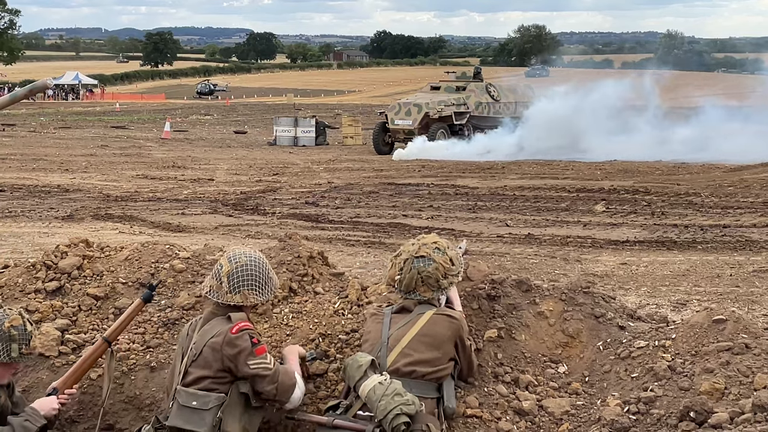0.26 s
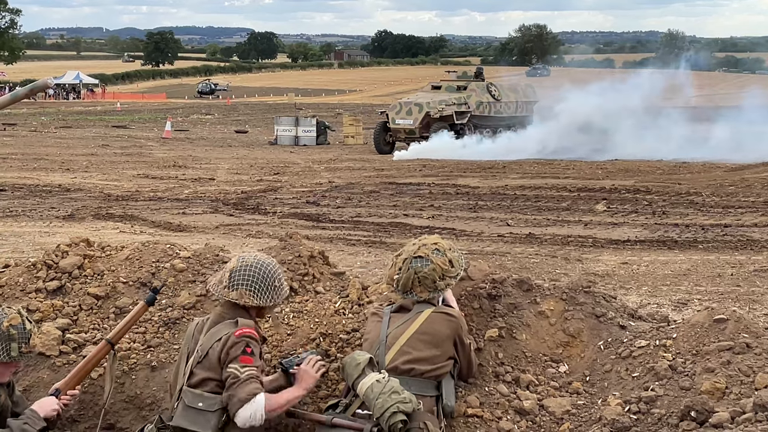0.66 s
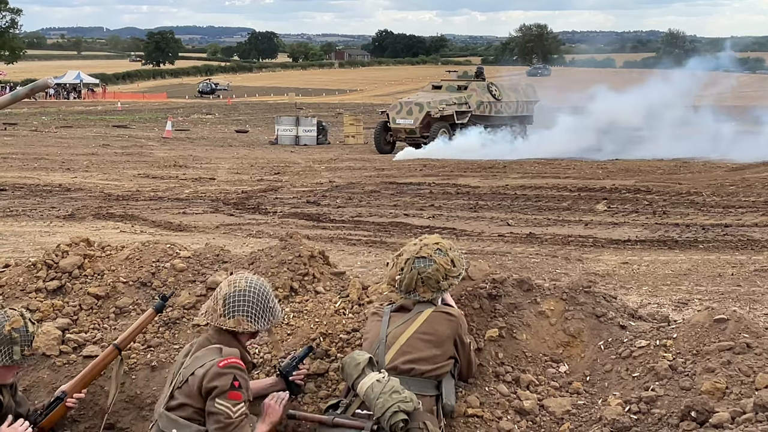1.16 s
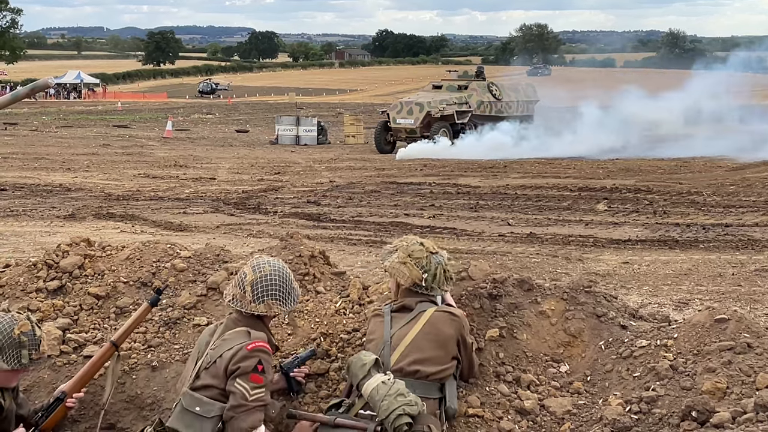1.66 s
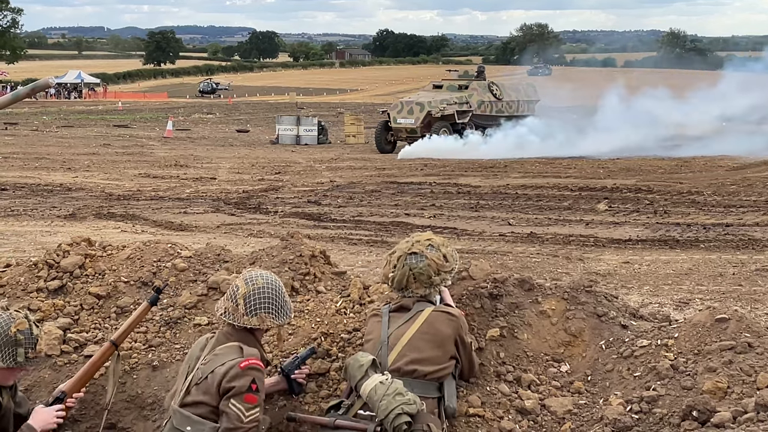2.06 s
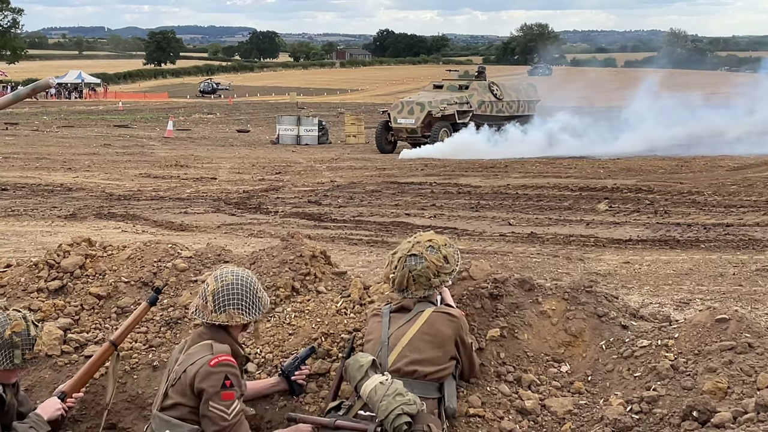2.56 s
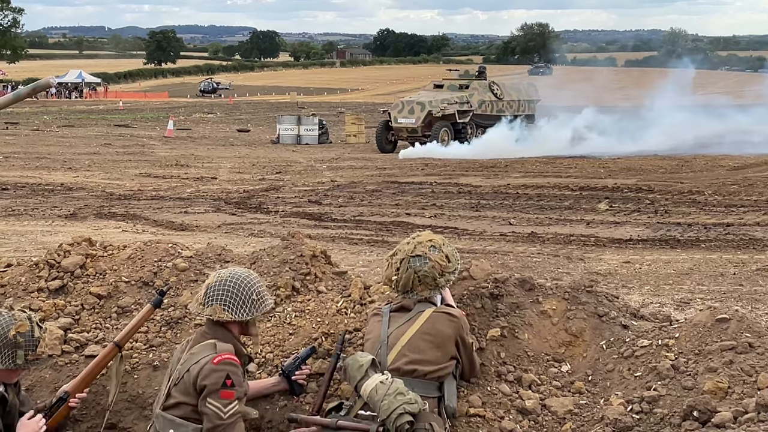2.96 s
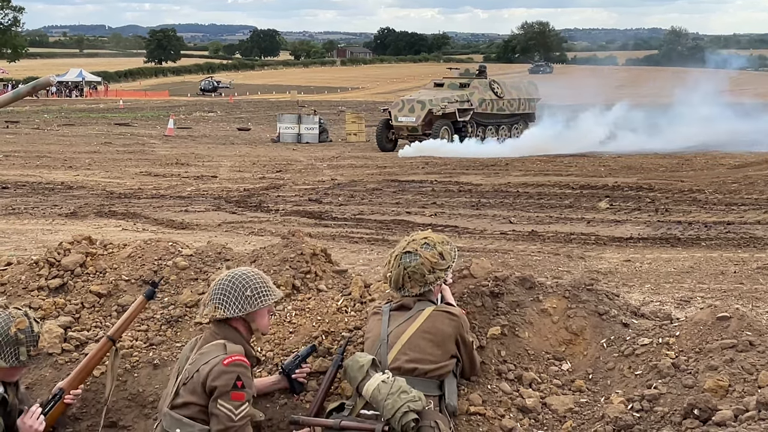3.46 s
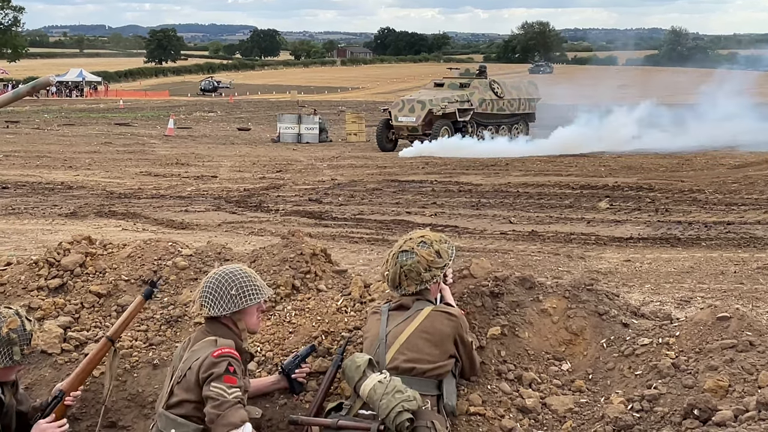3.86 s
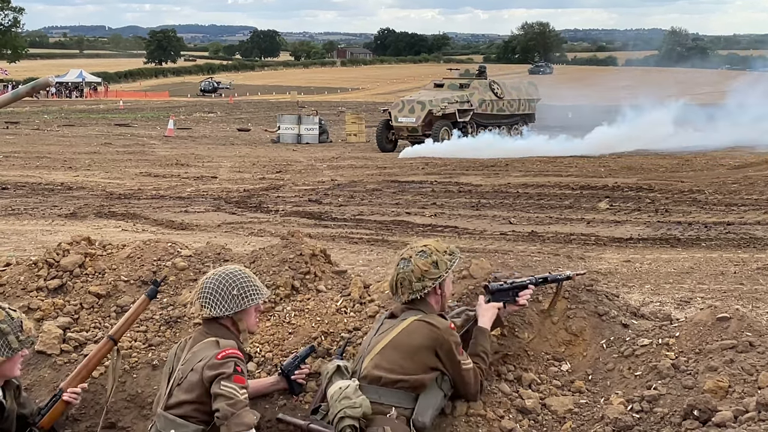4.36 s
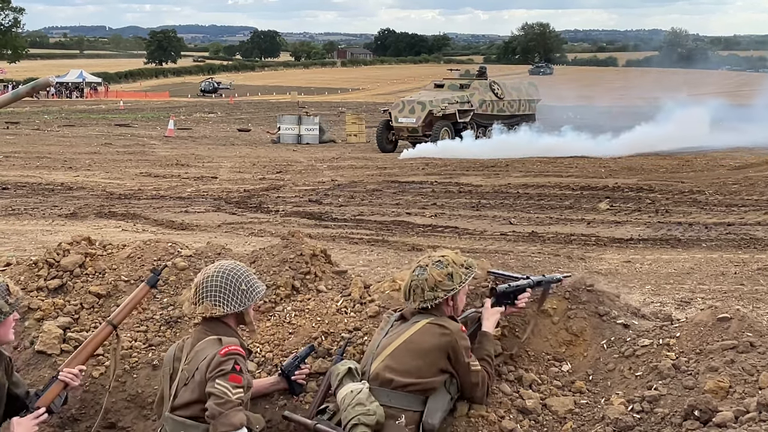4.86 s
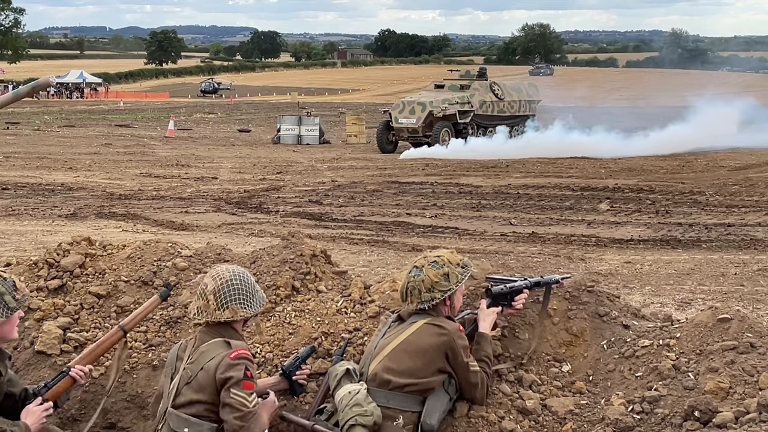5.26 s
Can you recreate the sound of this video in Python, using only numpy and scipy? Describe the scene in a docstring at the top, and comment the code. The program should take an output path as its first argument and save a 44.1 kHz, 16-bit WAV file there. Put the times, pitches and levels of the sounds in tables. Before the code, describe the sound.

From an earth trench in an open field, a machine-gun burst is already hammering, then stops. Separate rifle and carbine shots follow, with gaps of rolling echo and small metal clinks. A brief scrape leads into a fast six-shot submachine-gun burst from the left, one very strong rifle shot, and finally two machine guns overlapping. A faint engine idles far off. The close stereo microphone flattens the peaks.

```python
"""An open field, heard from behind an earth trench: blank gunfire from two machine guns,
a submachine gun, a carbine and single rifle shots. Each blast is a bass step with a ragged roar of gas;
it scatters off the dirt as fading noise and rolls away over the field. Small metal parts clink and something
scrapes close by, as short sprays of noise. A vehicle far off idles as three wavering tones.
The microphone smears each blast into a falling thump and flattens its peak."""
import sys
import numpy as np
from scipy import signal
from scipy.fft import rfft, irfft, next_fast_len
from scipy.io import wavfile
from scipy.ndimage import uniform_filter1d, map_coordinates

SR = 44100
rng = np.random.default_rng(int(sys.argv[2]) if len(sys.argv) > 2 else 0)


def log_audio(samples):
    """Write samples as a 16-bit WAV file to the path given in sys.argv[1]."""
    # one column per channel
    frames = np.atleast_2d(samples).T
    # limit to full scale, then quantise
    limited = np.clip(frames, -1, 1)
    pcm = np.round(limited * 32767).astype(np.int16)
    wavfile.write(sys.argv[1], SR, pcm)


N = 243431
SHOT = 16384  # samples in one blast or spray of noise
SHOT_HZ = np.fft.rfftfreq(SHOT, 1 / SR)
SHOT_T = np.arange(SHOT) / SR

# submachine gun, one row per pull of the trigger:
# (shots as a list of (time [s], strength against the usual shot [dB]), ring boost [dB], pan [dB])
SUBMACHINE_PULLS = [([(1.0658, .6)], 8, 4), ([(3.54, -1.3), (3.6256, -.1), (3.701, .9), (3.7754, -.3),
                    (3.842, .3), (3.9175, .5)], 0, 12)]
# rifles, each ringing at its own pitch:
# (time [s], strength [dB], ring pitch [Hz], ring boost [dB], extra scatter [dB])
RIFLE_SHOTS = [(1.2907, -1.8, 3200, 8, 1.5), (1.5531, -2.3, 2600, 7, 1), (2.6301, -1, 5000, 6, 0),
               (2.958, .5, 4300, 4, -1), (4.1036, 6, 2850, 11, -1)]
# the carbine's two quick shots: (time [s], strength against the usual shot [dB])
CARBINE_SHOTS = [(1.8081, -.3), (1.8821, .3)]
# how long the roll over the field takes to fall by 60 dB: (frequency [Hz], time [s])
FIELD_FADE = [(100, .95), (400, 0.66), (2000, 1.2), (6000, 0.57), (12000, 0.48)]


def amp(db):
    """Turns decibels into a plain multiplier."""
    return 10 ** (np.asarray(db) / 20)


def unit(x):
    """Scales a sound to an rms of 1."""
    return x / np.sqrt(np.mean(x ** 2) + 1e-20)


def pulse_size(x):
    """The rms that a sound would have if packed into 10 ms."""
    return np.sqrt(np.mean(np.sum(x ** 2, axis=-1)) / (SR / 100) + 1e-20)


def along(points, hz):
    """Reads a curve of (frequency [Hz], value) points, joined on a log frequency axis."""
    f, v = np.transpose(points)
    return np.interp(np.log(hz + 1), np.log(f + 1), v)


def filtered(x, response):
    """Multiplies the spectrum of x by a response, given as a function of frequency."""
    n = x.shape[-1]
    padded = next_fast_len(n + SHOT)
    spectrum = rfft(x, padded) * response(np.fft.rfftfreq(padded, 1 / SR))
    return irfft(spectrum, padded)[..., :n]


def causal(gain):
    """The response with this gain that rings only after its onset."""
    cepstrum = irfft(np.log(np.maximum(gain, 1e-6)))
    cepstrum[1:SHOT // 2] *= 2
    cepstrum[SHOT // 2 + 1:] = 0
    return np.exp(rfft(cepstrum))


def wobble(rate):
    """A smooth random curve through `rate` random points a second."""
    points = rng.standard_normal(int(N * rate / SR) + 4)
    return map_coordinates(points, [np.arange(N) * rate / SR])


def add(out, s, x):
    """Mixes x into out from time s, cutting what falls outside."""
    start = round(s * SR)
    part = x[..., max(-start, 0):max(N - start, 0)]
    out[:, max(start, 0):][:, :part.shape[-1]] += part


def diffuse(size):
    """Noise from all around: the two close ports differ mostly in the middle range."""
    side_curve = [(100, -14.5), (400, -2), (1300, 5), (2600, -28.5), (9000, -19)]  # (frequency [Hz], level [dB])
    mid, side = rng.standard_normal((2, size))
    side = filtered(side, lambda hz: amp(along(side_curve, hz)))
    return np.array([mid + side, mid - side])


def grain(size, depth_db):
    """Thousands of clods and stones each return a speck of sound: a rough envelope of rms 1."""
    roughness = unit(uniform_filter1d(rng.standard_normal(size), size=90))
    return unit(amp(depth_db * roughness))


def tail(gain, decay, rise, patchy_db, size):
    """Scattered sound, lumpy in time, each frequency dying at its own speed."""
    hz, t, z = signal.stft(diffuse(size) * grain(size, depth_db=2.5), SR, nperseg=256)
    lumps = uniform_filter1d(rng.standard_normal(z.shape[1:]), size=3)
    lumps = unit(uniform_filter1d(lumps, size=40, axis=0))
    fade_db = -60 * t / along(decay, hz)[:, None]
    x = signal.istft(z * amp(patchy_db * lumps + fade_db), SR, nperseg=256)[1]
    x = filtered(x, lambda f: np.interp(f, SHOT_HZ, gain))
    x = x * (1 - np.exp(-(np.arange(x.shape[1]) / SR / rise) ** 2))
    # the size is judged on the range from 1 to 7 kHz
    return x / pulse_size(filtered(x, lambda f: (f > 1000) & (f < 7000)))


def burst(colour, length):
    """A short spray of coloured noise whose source fades as exp(-time / length)."""
    spray = diffuse(SHOT) * np.exp(-SHOT_T / length)
    x = irfft(rfft(spray) * causal(amp(along(colour, SHOT_HZ))))
    return x / pulse_size(x)


def rolling(shots, quiet_db, roll_db, t60):
    """Level in dB over time: every shot adds to the quiet field a roll that swells and dies away."""
    rise_s = .05
    t = np.linspace(0, N / SR, num=N // 128)
    s, strength_db = np.transpose(shots)
    age = np.maximum(t[:, None] - s, 0)
    rolls = amp(roll_db + strength_db - 60 * age / t60) * (1 - np.exp(-age / rise_s))
    power = amp(quiet_db) ** 2 + np.sum(rolls ** 2, axis=1)
    return np.interp(np.arange(N) / SR, t, 10 * np.log10(power))


def field_air(shots):
    """The field's rumble and hiss are coloured noise that swells after each shot and wavers in level."""
    # colour of the rumble: (frequency [Hz], level [dB per Hz])
    rumble_colour = [(22, -29), (48, -4.5), (80, -3.5), (180, -7.5), (300, -15), (600, -28.5),
                     (2000, -70.5)]
    # colour of the hiss: (frequency [Hz], level [dB per Hz])
    hiss_colour = [(100, -11.5), (400, -7), (1200, 0), (2200, 3), (5500, -3), (7500, -14), (11000, -23),
                   (16000, -43.5)]
    rumble_db = rolling(shots, quiet_db=-62, roll_db=-51.5, t60=1.25)
    hiss_db = rolling(shots, quiet_db=-71.8, roll_db=-65, t60=1.5)
    rumble = unit(filtered(diffuse(N), lambda hz: amp(along(rumble_colour, hz))))
    hiss = unit(filtered(diffuse(N) * grain(N, depth_db=2.0), lambda hz: amp(along(hiss_colour, hz))))
    rumble = rumble * amp(rumble_db + 2.9 * wobble(9))
    hiss = hiss * amp(hiss_db + 1.6 * wobble(24))
    return rumble + hiss


def vehicle():
    """A distant engine idles unevenly: exhaust tones that drift together and waver one by one."""
    # exhaust tones: (frequency before drift [Hz], rms level before wavering [dB])
    exhaust_lines = [(48.4, -61), (77, -62.5), (102, -66.5)]
    uneven_time = np.cumsum(1 + 0.012 * wobble(5)) / SR
    exhaust = 0
    for hz, db in exhaust_lines:
        tone = np.sqrt(2) * np.sin(2 * np.pi * hz * uneven_time)
        exhaust = exhaust + amp(db + 2.8 * wobble(7)) * tone
    return exhaust


def clinks():
    """A few clear knocks of metal, each with one bounce, among fainter random ones: sprays of noise."""
    # clear knocks: (time [s], level [dB])
    knocks = [(1.211, -47), (1.246, -53), (1.382, -46), (1.960, -47), (3.996, -44.5), (4.042, -50.5),
              (4.138, -46)]
    # colour of the metal: (frequency [Hz], level [dB])
    metal_colour = [(400, -27), (1200, -13.5), (2600, -8), (5800, -11), (7500, -13), (11000, -28.5),
                    (16000, -33)]
    bounce_s, bounce_db = .012, -9  # after and against the first knock
    rattle_per_s, rattle_db, rattle_spread_db = 6, -68, 2.5
    out = np.zeros((2, N))
    bounces = [(s + bounce_s, db + bounce_db) for s, db in knocks]
    rattle = [(rng.uniform(0, N / SR), rng.normal(rattle_db, rattle_spread_db))
              for _ in range(round(rattle_per_s * N / SR))]
    for s, db in [*knocks, *bounces, *rattle]:
        add(out, s, amp(db) * burst(metal_colour, length=0.0035))
    return out


def scrape():
    """It catches hard, slips unevenly and ever more lightly, and stops with a last catch."""
    # the one scrape: (start [s], end [s], level of the two catches [dB])
    scrape_span = (3.297, 3.375, -43)
    # colour of the scrape: (frequency [Hz], level [dB])
    scrape_colour = [(300, -22), (800, -2.5), (1500, -7), (2400, 3.5), (4000, -4.5), (6300, 2), (8000, 0.5),
                     (12500, -14.5), (16000, -4.5)]
    slip_every_s, first_slip_db, fade_db_per_s = .011, -44.5, -70
    out = np.zeros((2, N))
    start, end, catch_db = scrape_span
    for s in (start, end):
        add(out, s, amp(catch_db) * burst(scrape_colour, length=.006))
    for s in np.arange(start + slip_every_s, end - slip_every_s / 2, slip_every_s):
        slip_db = first_slip_db + fade_db_per_s * (s - start) + rng.normal(0, 1.5)
        slip_s = s + slip_every_s * rng.uniform(-.5, .5)
        add(out, slip_s, amp(slip_db) * burst(scrape_colour, length=.009))
    return out


def carbine_smacks():
    """A sharp bright smack of noise follows each carbine shot and rings out over the field."""
    # colour of the smack: (frequency [Hz], level [dB])
    smack_colour = [(200, -45), (700, -20), (1500, -13), (3000, -3), (5500, -10), (7500, -15.5),
                    (11000, -20.5), (16000, -47.5)]
    delay_s, smack_db, field_db = .012, -28.8, -44.5
    field_gain = amp(along(smack_colour, SHOT_HZ))
    out = np.zeros((2, N))
    for s, strength_db in CARBINE_SHOTS:
        smack = burst(smack_colour, length=0.0066)
        ringing = tail(field_gain, FIELD_FADE, rise=.016, patchy_db=2.5, size=SR)
        add(out, s + delay_s, amp(smack_db + strength_db) * smack)
        add(out, s + delay_s, amp(field_db + strength_db) * ringing)
    return out


def automatic(start, rounds, cycle_s):
    """Evenly spaced rounds of nearly equal strength: rows (time [s], strength [dB])."""
    spread_db = .35  # from cartridge to cartridge
    times = start + cycle_s * np.arange(round(rounds))
    return np.column_stack([times, spread_db * rng.standard_normal(len(times))])


def faltering(shots):
    """The same shots, weaker for the few rounds where the gun falters."""
    from_s, to_s, falter_db = 4.63, 5.01, -8.5
    return [(s, db + falter_db * (from_s < s < to_s)) for s, db in shots]


def blast(shape, levels_db, roar, ragged):
    """One muzzle blast: a clean pressure step in the bass, a ragged roar of gas above it."""
    high = SHOT_HZ ** 2 / (SHOT_HZ ** 2 + 1300 ** 2)
    gas = 1 + ragged * high * rfft(roar / np.linalg.norm(roar))
    # the roar spreads the blast in time but hardly changes its colour
    gas = gas / np.abs(gas) ** .6
    # boom below 300 Hz, bark up to 2000 Hz, crack above: each is brought to its own level
    band = np.searchsorted([300, 2000], SHOT_HZ)
    gains_db = []
    for k, db in enumerate(levels_db):
        size = pulse_size(irfft(gas * shape * (band == k)))
        gains_db.append(db - 20 * np.log10(size))
    smooth_db = uniform_filter1d(np.array(gains_db)[band], size=61, mode="nearest")
    return gas * causal(shape * amp(smooth_db))


def bank_bounce(bounce, bounce_s):
    """The bank returns only the short waves, and this late copy cuts notches into the blast."""
    reflects = SHOT_HZ ** 2 / (SHOT_HZ ** 2 + 300 ** 2) / (1 + (SHOT_HZ / 2400) ** 2)
    reflects = reflects * np.clip(bounce, 0, .95)
    return (1 - reflects * np.exp(-2j * np.pi * SHOT_HZ * bounce_s)) / np.sqrt(1 + reflects ** 2)


def direction(lag_s, pan_db):
    """Direction shows as delay and shading up to the middle range; positive lag leads at the left."""
    sided = 1 / (1 + (SHOT_HZ / 1650) ** 8)
    shade_db = pan_db * sided * SHOT_HZ / (SHOT_HZ + 500)
    ears = np.array([amp(side * shade_db / 2) * np.exp(side * 1j * np.pi * SHOT_HZ * lag_s * sided)
                     for side in (1, -1)])
    return ears / np.sqrt(np.mean(np.abs(ears) ** 2, axis=0))


def echo(hz, delay):
    """A distinct echo from a bank, vehicle or hedge; longer paths smear it more."""
    # the colour steps up at hz / 4 and peaks at hz
    colour = [(hz / 4, -20), (hz / 4.0, -7), (hz, 0), (hz * 2.2, -7), (hz * 4, -20), (hz * 8, -40)]
    return burst(colour, length=0.0059 + .015 * delay)


def gun(shots, usual_db, colour, rings, echoes, length, ragged, bounce, bounce_s, lag_s, pan_db,
        direct_db, dirt_db, field_db):
    """Shots from one place: blast, bounce off a bank, scatter from the dirt, echoes, roll over the field."""
    # how the dirt colours what it sends back: (frequency [Hz], level [dB])
    dirt_colour = [(30, -1.5), (70, -2), (150, 1), (300, -2), (600, -7), (1200, -11), (2200, -3),
                   (5500, 0.5), (7500, -6.5), (11000, -15), (16000, -16)]
    # how long the dirt's scatter takes to fall by 60 dB: (frequency [Hz], time [s])
    dirt_fade = [(100, 0.22), (500, 0.15), (2000, 0.13), (6000, 0.13), (12000, 0.42)]
    # how the field colours what it sends back: (frequency [Hz], level [dB])
    field_colour = [(30, -2.5), (70, -8), (150, 4.5), (300, -3), (600, -14), (1200, -15.5), (2200, -12.5),
                    (5500, -4.5), (7500, -16.5), (11000, -35.5), (16000, -35)]
    # a stronger shot gains mostly boom, per dB of strength:
    # (boom [dB], bark [dB], crack [dB], scatter [dB])
    strength_law = (1.05, .5, .42, .42)
    out = np.zeros((2, N))
    bank = bank_bounce(bounce, bounce_s)
    ears = direction(lag_s, pan_db)
    ring_db = sum(db / (1 + (2 * (SHOT_HZ - hz) / max(width, hz / 10)) ** 2) for hz, width, db in rings)
    shape = amp(along(colour, SHOT_HZ) + ring_db)
    # the tails keep the colour of the gun that set them off
    dirt = np.abs(bank) * shape * amp(along(dirt_colour, SHOT_HZ))
    field = np.abs(bank) * shape * amp(along(field_colour, SHOT_HZ))
    for s, strength_db in shots:
        boom_db, bark_db, crack_db, scatter_db = np.add(usual_db, np.multiply(strength_law, strength_db))
        roar = rng.standard_normal(SHOT) * np.exp(-(SHOT_T / length) ** 2)
        direct = irfft(blast(shape, (boom_db, bark_db, crack_db), roar, ragged) * bank * ears)
        near = tail(dirt, dirt_fade, rise=0.001, patchy_db=1.5, size=SHOT)
        far = tail(field, FIELD_FADE, rise=0.016, patchy_db=1.5, size=SR)
        add(out, s, amp(direct_db) * direct[:, :SHOT // 2])
        add(out, s, amp(scatter_db + dirt_db) * near)
        add(out, s, amp(scatter_db + field_db) * far)
        for delay, db, hz in echoes:
            add(out, s + delay, amp(scatter_db + db) * echo(hz, delay))
    return out


def carbine():
    """Two quick shots from nearly ahead, each with a very short roar and late, low echoes."""
    # the usual shot, before trims: (boom [dB], bark [dB], crack [dB], scatter [dB])
    carbine_usual = (-19.2, -19, -33, -34.7)
    # blast colour before the bands are levelled: (frequency [Hz], level [dB per Hz])
    carbine_colour = [(25, -32.5), (50, -9.5), (90, -3.5), (190, 0), (400, 0.5), (800, -7), (1200, -14),
                      (2500, -15.5), (5500, -27.5), (7200, -32.5), (11000, -39), (16000, -54)]
    # peaks in the bark: (frequency [Hz], width [Hz], boost [dB])
    carbine_rings = [(414, 180, 1.9), (3020, 490, 2)]
    # echoes: (delay [s], level against the scatter [dB], centre [Hz])
    carbine_echoes = [(.383, -24, 2700), (.537, -23.5, 900), (.673, -19, 790)]
    return gun(CARBINE_SHOTS, carbine_usual, carbine_colour, carbine_rings, carbine_echoes,
               length=0.0008, ragged=0.79, bounce=0.39, bounce_s=.003, lag_s=.00002, pan_db=2.5,
               direct_db=-0.95, dirt_db=-2, field_db=-15.5)


def rifles():
    """Single shots that arrive first at the right port, each blast with a ring of its own pitch."""
    # the usual shot, before trims: (boom [dB], bark [dB], crack [dB], scatter [dB])
    rifle_usual = (-15.3, -16.7, -19.3, -37.9)
    # blast colour before the bands are levelled: (frequency [Hz], level [dB per Hz])
    rifle_colour = [(25, -34.5), (45, -3.5), (70, 0), (170, 2), (360, 5.5), (650, 0.5), (1100, -12),
                    (1800, -10), (2800, -15), (5500, -17), (7200, -26), (10000, -23.5), (16000, -46.5)]
    # peaks shared by all shots: (frequency [Hz], width [Hz], boost [dB])
    rifle_rings = [(460, 50, 4.9), (2840, 540, 2), (4040, 470, 3.4), (5130, 800, 2.4)]
    # echoes: (delay [s], level against the scatter [dB], centre [Hz])
    rifle_echoes = [(0.031, -11, 3400), (.059, -9, 2200)]
    ring_width_hz = 700
    out = np.zeros((2, N))
    for s, strength_db, ring_hz, ring_db, extra_db in RIFLE_SHOTS:
        rings = [*rifle_rings, (ring_hz, ring_width_hz, ring_db)]
        out += gun([(s, strength_db)], rifle_usual, rifle_colour, rings, rifle_echoes,
                   length=0.0012, ragged=1.4, bounce=0.3, bounce_s=.0042, lag_s=-0.0003, pan_db=2.5,
                   direct_db=-0.55, dirt_db=6.0 + extra_db, field_db=-13.5 + extra_db)
    return out


def submachine_gun():
    """Unevenly spaced shots from the left; one ring in the blast differs from pull to pull."""
    # the usual shot, before trims: (boom [dB], bark [dB], crack [dB], scatter [dB])
    sub_usual = (-14.4, -16.5, -19.5, -32.4)
    # blast colour before the bands are levelled: (frequency [Hz], level [dB per Hz])
    sub_colour = [(25, -51.5), (45, -17), (80, -5.5), (125, -7), (220, -11.5), (330, -6.5), (600, -5.5),
                  (1200, -10.5), (2000, -15.5), (2700, -27.5), (4500, -22.5), (7000, -26), (9500, -26),
                  (16000, -51)]
    # peaks and hollows shared by all pulls: (frequency [Hz], width [Hz], boost [dB])
    sub_rings = [(128, 60, 5.6), (230, 45, -3.5), (1140, 400, 1.5), (1980, 570, 5), (2950, 370, 7.5),
                 (4330, 1000, 7.4)]
    # echoes: (delay [s], level against the scatter [dB], centre [Hz])
    sub_echoes = [(0.01, -13, 4500), (.04, -7, 2227)]
    ring_hz, ring_width_hz = 1800, 900
    out = np.zeros((2, N))
    for shots, ring_db, pan_db in SUBMACHINE_PULLS:
        rings = [*sub_rings, (ring_hz, ring_width_hz, ring_db)]
        out += gun(shots, sub_usual, sub_colour, rings, sub_echoes,
                   length=0.0014, ragged=1.83, bounce=0.44, bounce_s=0.0015, lag_s=.00032, pan_db=pan_db,
                   direct_db=-1.1, dirt_db=4.1, field_db=-9)
    return out


def second_machine_gun(shots):
    """One burst from nearly ahead, each blast with a long roar of gas."""
    # the usual shot, before trims: (boom [dB], bark [dB], crack [dB], scatter [dB])
    second_usual = (-12.8, -11, -17.5, -29.3)
    # blast colour before the bands are levelled: (frequency [Hz], level [dB per Hz])
    second_colour = [(25, -20.5), (45, -12), (80, -3.5), (200, -7), (400, -0.5), (650, -16), (1000, -12),
                     (1600, -17), (3000, -14), (5800, -21.5), (7200, -21.5), (10000, -22), (16000, -38)]
    # peaks in the bark: (frequency [Hz], width [Hz], boost [dB])
    second_rings = [(390, 240, 1.8), (900, 200, 3.2), (2190, 220, 3)]
    # echoes: (delay [s], level against the scatter [dB], centre [Hz])
    second_echoes = [(.05, -16.5, 1970)]
    return gun(shots, second_usual, second_colour, second_rings, second_echoes,
               length=0.0082, ragged=1.4, bounce=0.083, bounce_s=0.0021, lag_s=-.00005, pan_db=3.5,
               direct_db=-1.5, dirt_db=-1.5, field_db=-9.5)


def machine_gun(bursts):
    """Bursts from ahead: very ragged blasts, with a bounce off the bank timed for each burst."""
    # the usual shot, before trims: (boom [dB], bark [dB], crack [dB], scatter [dB])
    machine_usual = (-14.2, -15.9, -16.7, -32.7)
    # blast colour before the bands are levelled: (frequency [Hz], level [dB per Hz])
    machine_colour = [(25, -37), (45, -11.5), (70, -2.5), (115, 1.2), (200, -3.6), (350, -8.5), (600, -8),
                      (850, -10.5), (1500, -13.5), (3000, -18.5), (5800, -25.5), (7200, -28.5),
                      (10000, -27), (16000, -46.5)]
    # peaks and hollows in the bark: (frequency [Hz], width [Hz], boost [dB])
    machine_rings = [(334, 97, 2.5), (545, 70, -2), (672, 110, 3), (820, 160, 5.5), (1360, 350, 3.5),
                     (2140, 190, 6), (2870, 530, 6.5)]
    # echoes: (delay [s], level against the scatter [dB], centre [Hz])
    machine_echoes = [(0.042, -6, 1512), (.098, -11, 1971), (.212, -25, 830)]
    out = np.zeros((2, N))
    for shots, bounce_s in bursts:
        out += gun(shots, machine_usual, machine_colour, machine_rings, machine_echoes,
                   length=0.0039, ragged=2.1, bounce=0.5, bounce_s=bounce_s, lag_s=.00001, pan_db=-0.2,
                   direct_db=-0.2, dirt_db=3.2, field_db=-12.7)
    return out


def scene():
    """Times all the shots, then adds up the field, the small sounds and the guns."""
    # the first gun's bursts: (first shot [s], rounds [count], delay of the bounce off the bank [s])
    machine_bursts = [(-0.0684, 7, .00205), (4.4831, 9, .00178)]
    # the second gun's one burst: (first shot [s], rounds [count])
    second_start = (4.6724, 3)
    bursts = [(faltering(automatic(start, rounds, cycle_s=.0958)), bounce_s)
              for start, rounds, bounce_s in machine_bursts]
    second_burst = automatic(*second_start, cycle_s=.10745)
    grouped_shots = [row[0] for row in [*bursts, *SUBMACHINE_PULLS]]
    every_shot = np.vstack(grouped_shots + [second_burst, np.array(RIFLE_SHOTS)[:, :2], CARBINE_SHOTS])
    background = field_air(every_shot) + vehicle()
    small_sounds = clinks() + scrape() + carbine_smacks()
    guns = carbine() + rifles() + submachine_gun() + second_machine_gun(second_burst) + machine_gun(bursts)
    return background + small_sounds + guns


def record(dry):
    """The microphone delays the bass and skews the treble between its ports; peaks are flattened."""
    # phase between the two ports: (frequency [Hz], lead of the left [radians])
    port_phase = [(2000, 0), (3000, .4), (4500, .05), (6300, .05), (7200, 2.5), (9000, 2.2), (11000, .6),
                  (13000, -1.8), (15000, -3)]
    ceiling, top_hz = .92, 16600
    late_bass = lambda hz: np.exp(-2j * np.pi * .9 * np.log(1 + hz / 30))
    ports = lambda hz: np.exp(.5j * np.outer([1, -1], along(port_phase, hz)))
    x = filtered(dry, lambda hz: late_bass(hz) * ports(hz))
    x = x / (1 + np.abs(x / ceiling) ** 6) ** (1 / 6)
    # almost nothing passes above the top frequency
    return filtered(x, lambda hz: 1 / (1 + (hz / top_hz) ** 80))


dry = scene()
out = record(dry)
log_audio(out)
```